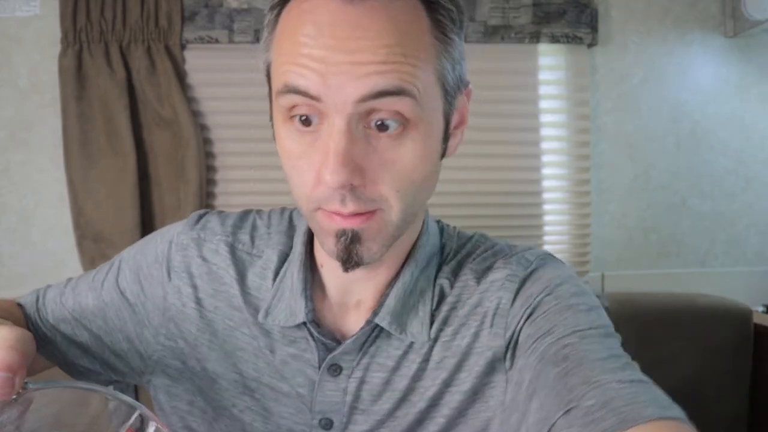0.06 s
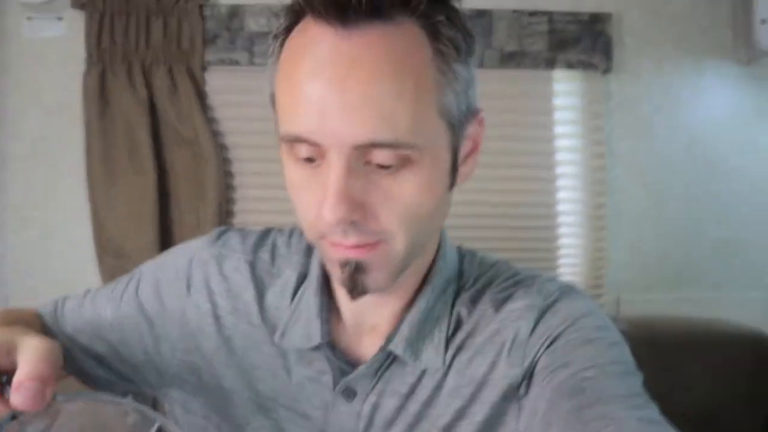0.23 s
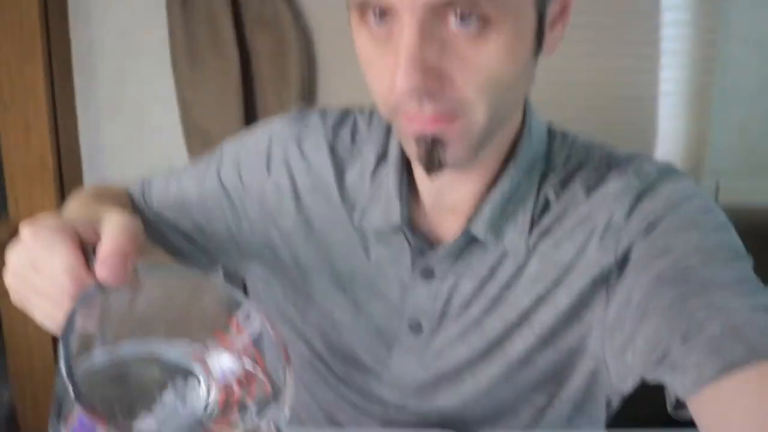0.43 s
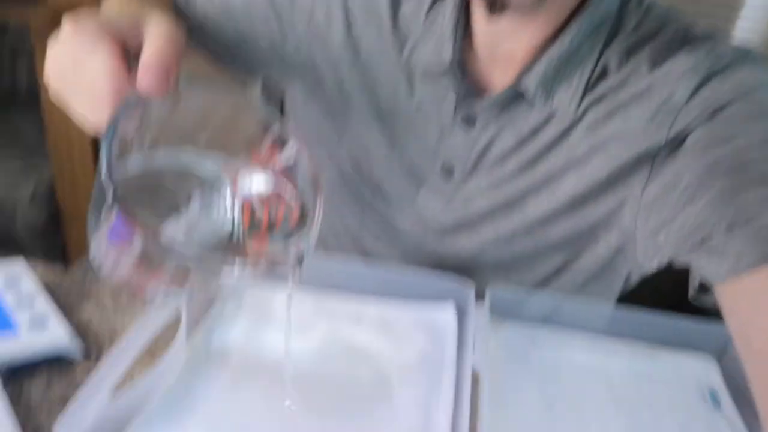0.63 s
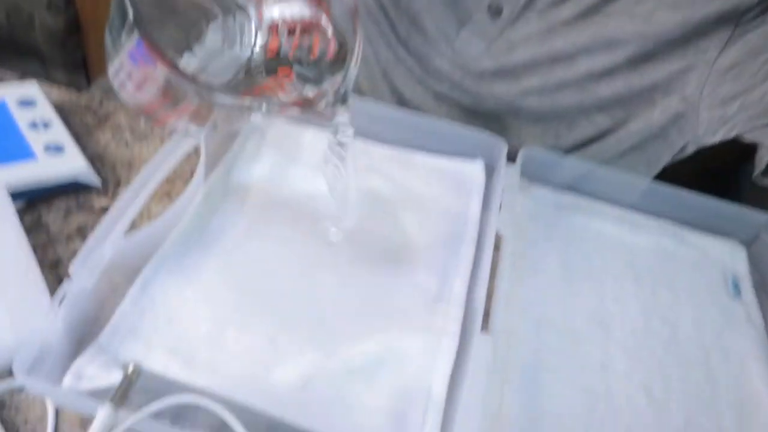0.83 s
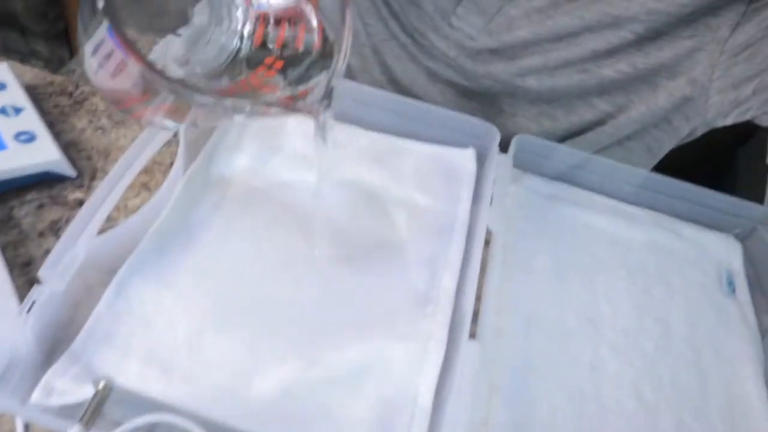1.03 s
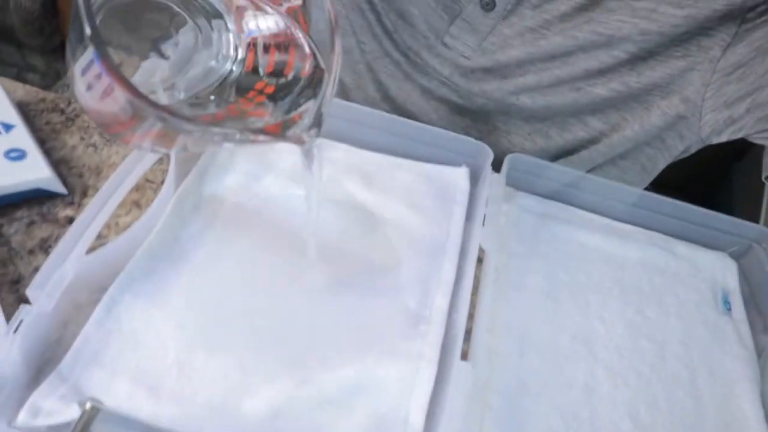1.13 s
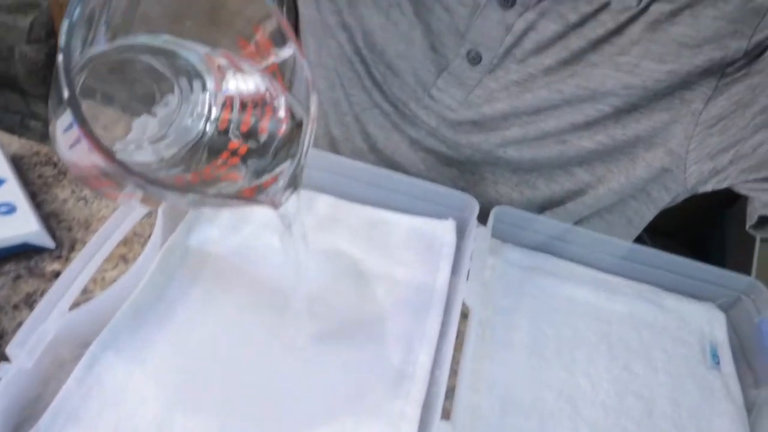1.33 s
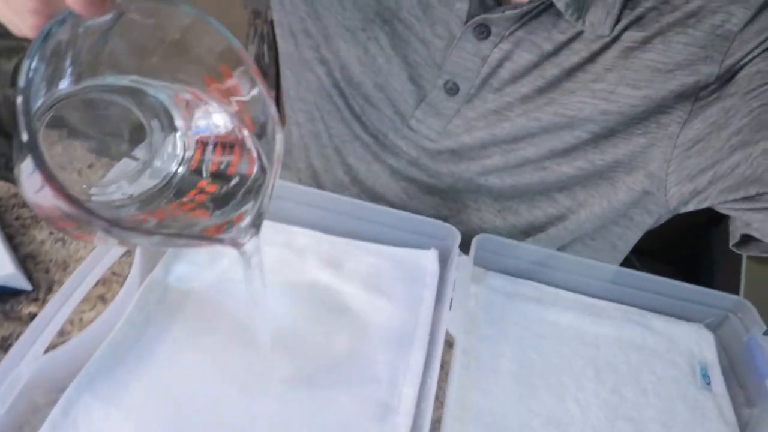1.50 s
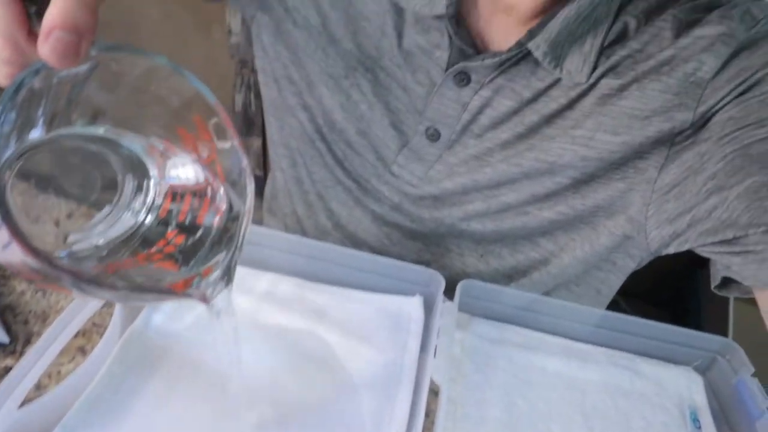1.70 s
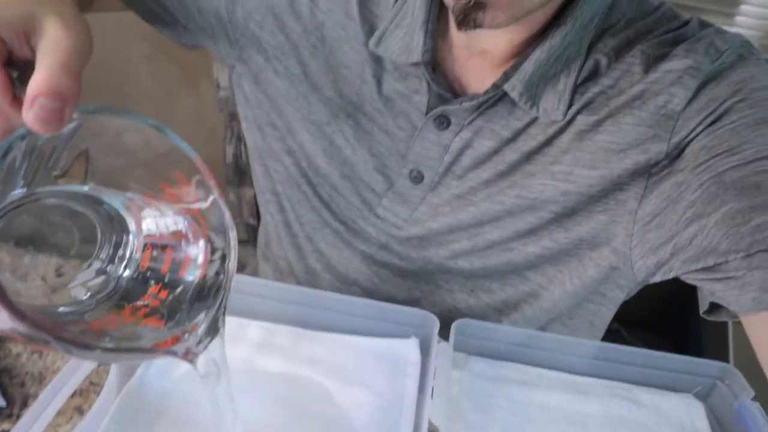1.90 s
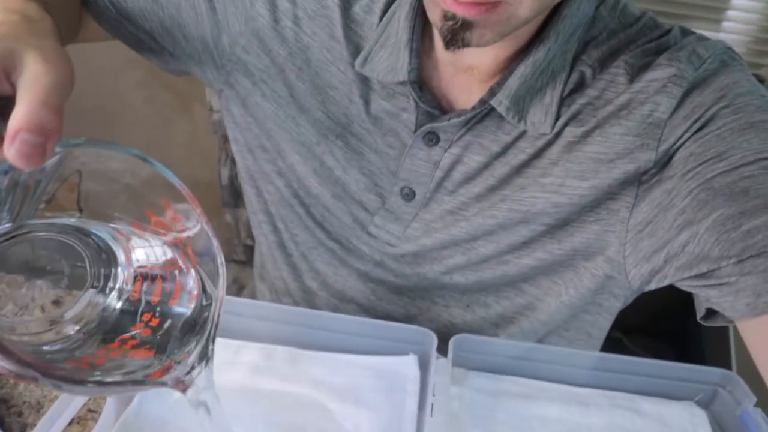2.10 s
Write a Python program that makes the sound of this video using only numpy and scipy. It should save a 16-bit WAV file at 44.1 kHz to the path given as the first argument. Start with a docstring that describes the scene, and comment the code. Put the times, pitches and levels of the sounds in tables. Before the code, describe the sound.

In a small room with a faint hum and hiss, a microphone is moved with low bumps and plastic crackles. Then a thin pour of water drips and patters lightly into a shallow tray, with one more soft bump.

```python
"""Mains hum and faint hiss sit in a small room throughout. First a camera is tilted by hand: its plastic
mount crackles as it rubs, takes soft low bumps and sways with a deep rumble. From about 0.4 s, as the
handling eases, a few drops ping. Then water is poured from a glass cup onto a shallow tray: droplets ping
and spatter in a fine spray, and a few bubbles sing. The mount bumps once more near 1.5 s, and the drops
patter on to the end."""
import sys
import numpy as np
from scipy import signal
from scipy.fft import rfft, irfft
from scipy.io import wavfile
from scipy.ndimage import uniform_filter1d

SR = 44100
rng = np.random.default_rng(int(sys.argv[2]) if len(sys.argv) > 2 else 0)


def dump(signal):
    """Clip the signal to [-1, 1] and save it as 16-bit WAV at the path in sys.argv[1]."""
    limited = np.clip(np.atleast_2d(signal).T, -1, 1)
    pcm = np.round(limited * 32767).astype(np.int16)
    wavfile.write(sys.argv[1], SR, pcm)


N = 94815


def undb(db):
    """Decibels to gain."""
    return 10 ** (np.asarray(db) / 20)


def unit_rms(x):
    """Normalise to an rms of 1."""
    return x / np.sqrt(np.mean(x ** 2))


def resonate(x, hz, width_hz):
    """Two-pole resonance, unity gain at the centre."""
    centre = min(hz, .45 * SR)
    q = centre / min(width_hz, .3 * SR)
    return signal.lfilter(*signal.iirpeak(centre, q, SR), x)


def band(x, hz, width_hz):
    """Band-pass: a resonance, then one twice as wide to steepen the skirts."""
    return resonate(resonate(x, hz, width_hz), hz, 2 * width_hz)


def place(out, start, sound):
    """Mix a one-shot in at a start time in seconds."""
    i = int(start * SR)
    out[i:i + len(sound)] += sound[:N - i]


def ping(db, hz, decay_ms, attack_cycles=1.1, glide_per_cycle=.006):
    """A bubble swells within a cycle or two and rings briefly, bending up in pitch."""
    t = np.arange(int(SR * decay_ms * .008) + 8) / SR
    envelope = (1 - np.exp(-hz * t / attack_cycles)) * np.exp(-t * 1000 / decay_ms)
    phase = 2 * np.pi * hz * t * (1 + glide_per_cycle * hz * t / 2)
    return undb(db) * envelope / envelope.max() * np.sin(phase)


# Droplet and bubble pings: t/s, level/dB, f/Hz, decay/ms
DROPLETS = [(0.3667, -20.5, 11760, 0.18), (0.449, -35.5, 2550, 2.7), (0.471, -28, 6300, 0.18),
            (0.502, -29.5, 4840, 2.4), (0.5117, -27.5, 5230, 1.6), (0.5335, -28.5, 5620, 4.2),
            (0.558, -29.5, 4830, 2.5), (0.5711, -27.5, 3340, 0.31), (0.5718, -33, 8730, 2.4),
            (0.5776, -26, 6900, 0.45), (0.5976, -19.5, 3265, 1.5), (0.6072, -26.5, 5940, 1),
            (0.636, -23, 5100, 0.26), (0.6382, -30.5, 8400, 0.49), (0.6456, -35, 3440, 2.1),
            (0.665, -35, 1700, 1.2), (0.6734, -17, 3570, 1.65), (0.8272, -39.5, 7770, 1.1),
            (0.949, -21.5, 5200, 0.12), (0.9877, -32, 5000, 0.97), (1.0126, -32, 7950, 1.6),
            (1.0217, -23.5, 4600, 0.66), (1.022, -45.5, 1644, 10), (1.038, -40, 4930, 2.6),
            (1.053, -26.5, 4850, 0.86), (1.06, -33, 5620, 1.9), (1.067, -30.5, 3700, 0.59),
            (1.0886, -27, 4920, 2.2), (1.1662, -22, 5085, 1.23), (1.3503, -37, 4480, 2.1),
            (1.37, -44, 7300, 1), (1.3978, -27.5, 10640, 0.6), (1.4198, -29, 5480, 0.66),
            (1.454, -34, 5220, 2.4), (1.4767, -32.5, 7040, 0.57), (1.5047, -23, 6670, 0.99),
            (1.5354, -47, 7200, 0.42), (1.557, -20.5, 4980, 0.37), (1.5658, -34, 12200, 0.7),
            (1.566, -27, 3430, 1.1), (1.5855, -24, 4450, 0.81), (1.5922, -31, 3000, 0.53),
            (1.6029, -29.5, 3600, 0.81), (1.6177, -31, 6430, 0.88), (1.636, -39.0, 4850, 0.89),
            (1.657, -32.5, 5700, 0.65), (1.659, -30.5, 6630, 0.89), (1.666, -37, 4700, 0.98),
            (1.6689, -33.5, 12800, 0.29), (1.692, -51, 4200, 0.48), (1.706, -36, 5570, 1.3),
            (1.7165, -34.5, 13500, 0.79), (1.7243, -35, 9540, 0.76), (1.776, -32.5, 7000, 0.71),
            (1.787, -36, 9300, .7), (1.8857, -36.5, 14200, 0.83), (1.9246, -30.5, 1865, 5.7),
            (1.98, -32.5, 8100, 0.48), (2.0075, -35.5, 6800, 0.75), (2.014, -34.5, 5240, 0.72),
            (2.0195, -36, 4600, 1.4), (2.028, -28, 8900, 0.33), (2.03, -40, 1253, 21),
            (2.0505, -30, 2024, 2.3), (2.059, -56, 6400, 0.72), (2.0687, -25.5, 5200, 0.81),
            (2.0715, -30, 8060, 0.77), (2.0757, -21.5, 3600, 0.41), (2.081, -27, 6100, 1.1),
            (2.106, -17, 4000, 0.1), (2.108, -20.5, 9000, 0.26), (2.136, -18, 5900, 0.14),
            (2.139, -31, 2320, 2.4), (2.141, -34, 6400, 3)]
def droplets(splat_db=-9.5, splat_ms=1.81, fizz_db=2, fizz_from_hz=4300):
    """Each drop layers a ping, a wet splat and, on the small high ones, a fizzing tail."""
    out = np.zeros(N)
    ms = np.arange(SR // 20) * 1000 / SR
    for start, db, hz, decay_ms in DROPLETS:
        place(out, start, ping(db, hz, decay_ms))
        noise = rng.standard_normal(len(ms))
        splat = band(noise * np.exp(-ms / splat_ms), 1.025 * hz, width_hz=hz)
        fizz = band(noise * np.exp(-ms / (1.98 * decay_ms)), hz, width_hz=.22 * hz)
        fizz /= 1 + (fizz_from_hz / hz) ** 4
        place(out, start, undb(db + splat_db) * splat + undb(db + fizz_db) * fizz)
    return out


def spray(drops, start=.44, per_second=1100, lowest_hz=3000, octaves=2.3, floor_db=-62, follow_db=-3.5):
    """A mist of tiny random pings that swells around the distinct drops."""
    mist = np.zeros(N)
    gap, loudness, pitch = rng.random((6000, 3)).T
    times = start + np.cumsum(-np.log(1 - gap)) / per_second
    levels_db = -8 * np.log10(1 - loudness)  # one in ten is over 8 dB above the faintest
    for onset, db, hz in zip(times[times < N / SR], levels_db, lowest_hz * 2 ** (pitch * octaves)):
        place(mist, onset, ping(db, hz, decay_ms=.4))
    window = int(.035 * SR)  # envelope follower, smoothed twice over 35 ms
    splashing = uniform_filter1d(uniform_filter1d(np.abs(drops), window), window)
    return unit_rms(mist) * (undb(floor_db) + undb(follow_db) * splashing)


# Body resonances of the mount's plastic: f/Hz, width/Hz, relative level/dB
PLASTIC_MODES = [(403, 213, 10.5), (673, 132, 7), (863, 166, 6.5), (1588, 50, 1), (2315, 93, 0.5),
                 (3080, 140, -4), (3460, 180, -5), (5270, 260, 1.5)]
def plastic_body(rub, detune=.037, scatter_db=3):
    """The plastic rings; each rub grips it a little differently, nudging its pitches and levels."""
    body = np.zeros(len(rub))
    for hz, width_hz, db in PLASTIC_MODES:
        pitch_nudge, level_nudge = rng.standard_normal(2)
        mode = resonate(rub, hz * (1 + detune * pitch_nudge), width_hz)
        body += undb(db + scatter_db * level_nudge) * mode
    return body


# Crackling rubs of the mount: t/s, drive level/dB, decay/ms, centre f/Hz
MOUNT_RUBS = [(0.053, -33.5, 3.6, 2260), (0.068, -30.5, 2.7, 2130), (0.094, -40, 66, 444),
              (0.1083, -21, 11.7, 2740), (0.158, -30.5, 16, 2120), (0.167, -26, 9.6, 2900),
              (0.197, -33.5, 16, 497), (0.2066, -20.5, 1.8, 2220), (0.2273, -24.5, 3.7, 2860),
              (.252, -28, 8, 1230), (0.2652, -21.5, 8.2, 2200), (.304, -31, 7.1, 1580),
              (0.316, -20.5, 9.7, 3450), (0.3261, -18, 4.1, 2320), (0.355, -28, 8.4, 1930),
              (0.38, -32, 9.4, 1440), (0.395, -35, 3.5, 490), (0.554, -32.5, 5.4, 790),
              (.796, -40.5, 3.3, 3370)]
def mount_rubs(clicks_per_second=7000, scatter_db=10, direct_db=-1, body_gain=2):
    """Bursts of dense, uneven friction clicks excite the plastic."""
    trigger, polarity, strength = rng.random((N, 3)).T
    clicks = (trigger < clicks_per_second / SR) * np.sign(polarity - .5)
    clicks = unit_rms(clicks * undb(scatter_db * strength))
    out = np.zeros(N)
    ms = np.arange(SR // 6) * 1000 / SR
    for start, db, decay_ms, hz in MOUNT_RUBS:
        attack_ms = .079 / undb(db)  # fainter rubs swell more slowly
        envelope = np.minimum(ms / attack_ms, np.exp(-(ms - attack_ms) / decay_ms))
        i = int(start * SR)
        rub = undb(db) * band(clicks[i:i + len(ms)] * envelope, hz, width_hz=hz)
        place(out, start, undb(direct_db) * rub + body_gain * plastic_body(rub))
    return out


# Thumps carried through the mount: t/s, level/dB, f/Hz, t60/s
MOUNT_BUMPS = [(0.146, -34, 126, 0.2), (0.21, -3.5, 76.6, 0.022), (0.228, -14, 53.4, 0.29),
               (0.257, -1.5, 122.3, 0.11), (0.293, -13.5, 109, 0.18), (0.319, -7.5, 27.2, 0.07),
               (0.334, -1, 116, 0.027), (.364, -4.5, 77.6, 0.051), (.382, -9, 109.2, 0.11),
               (0.397, -3, 147, 0.014), (0.446, -25, 99, 0.17), (0.557, -14, 110, 0.12),
               (0.8, -27, 123.4, 0.14), (1.464, -18.5, 111.6, 0.11)]
def mount_bumps(attack_ms=2.52, overtone_ratio=2.3, overtone_db=-25):
    """Soft blows set the mount ringing: a low tone with one faint overtone."""
    out = np.zeros(N)
    t = np.arange(SR // 3) / SR
    for start, db, hz, t60 in MOUNT_BUMPS:
        phase = 2 * np.pi * hz * t
        tone = np.sin(phase) + undb(overtone_db) * np.sin(overtone_ratio * phase)
        envelope = (1 - np.exp(-t * 1000 / attack_ms)) * 1000 ** (-t / t60)
        place(out, start, undb(db) * tone * envelope)
    return out


# Fader ride on the mount's sway: t/s, level/dB
SWAY_LEVELS = [(0, -52), (.18, -44), (.25, -17), (.45, -16.5), (.62, -29), (.74, -31), (.96, -33),
               (1.02, -35), (1.48, -44.5), (1.53, -31.5), (1.62, -33), (1.8, -42), (1.95, -44.5),
               (2.15, -38.5)]
def mount_sway():
    """Random pushes on the mount's slow resonance make a sub-bass rumble."""
    fader = undb(np.interp(np.arange(N) / SR, *np.array(SWAY_LEVELS).T))
    rumble = band(rng.standard_normal(N), hz=24.2, width_hz=17.6)
    return fader * unit_rms(rumble)


# Mains fundamental and harmonics: f/Hz, rms level/dB
HUM_PARTIALS = [(60, -42.5), (120, -59), (180, -54), (240, -67), (300, -63), (420, -69)]
def mains_hum():
    """A steady bed of mains sines, each at a random phase."""
    t = np.arange(N) / SR
    return sum(undb(db) * np.sqrt(2) * np.sin(2 * np.pi * (hz * t + rng.random()))
               for hz, db in HUM_PARTIALS)


# EQ curve of the room hiss: f/Hz, relative level/dB
HISS_EQ = [(120, -4), (200, -7.5), (1200, -14), (5000, -23), (16000, -28.5)]
def room_hiss(rms_db=-54):
    """Faint, smooth noise that darkens towards the top."""
    bin_hz = np.arange(N // 2 + 1) * SR / N + 1  # 1 Hz up keeps the log finite
    hz, db = np.array(HISS_EQ).T
    eq = undb(np.interp(np.log(bin_hz), np.log(hz), db))
    hiss = irfft(rfft(rng.standard_normal(N)) * eq, N)
    return undb(rms_db) * unit_rms(hiss)


def small_room(x, echo_ms=3.3, echo_db=-16.5, t60=.12, tail_db=-13, damping_hz=6300):
    """Tight reverb: the direct sound, one early reflection and a short diffuse tail."""
    t = np.arange(SR // 4) / SR
    response = signal.lfilter(*signal.butter(1, damping_hz, fs=SR), rng.standard_normal(len(t)))
    response *= 1000 ** (-t / t60) * np.minimum(t * 1000 / echo_ms, 1)
    response *= undb(tail_db) / np.sqrt(np.sum(response ** 2))
    response[0] = 1  # direct sound
    response[int(echo_ms * SR / 1000)] += undb(echo_db)
    return signal.fftconvolve(x, response)[:N]


def scene():
    """Mono mix: water and rubs go through the room; bumps, sway, hum and hiss stay dry."""
    drops = droplets()
    water = drops + spray(drops)
    in_room = small_room(water + mount_rubs())
    return (in_room + mount_bumps() + mount_sway() + mains_hum() + room_hiss())[None]


def record(dry, cutoff_hz=16750):
    """A steep high cut on the whole mix."""
    return signal.sosfilt(signal.ellip(10, .2, 60, cutoff_hz, fs=SR, output="sos"), dry)


dry = scene()
out = record(dry)
dump(out)
```